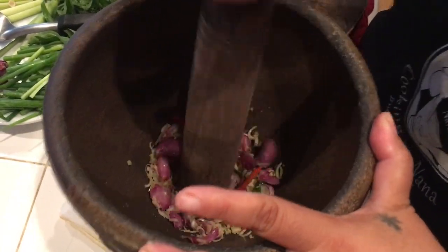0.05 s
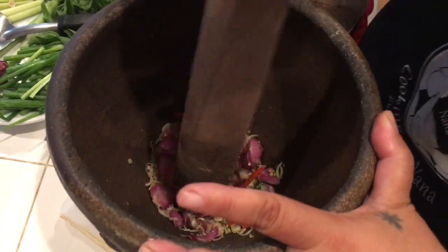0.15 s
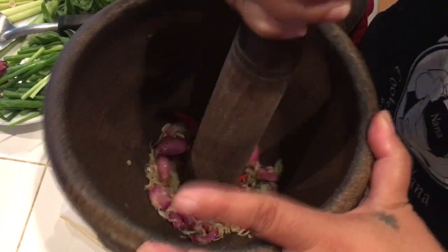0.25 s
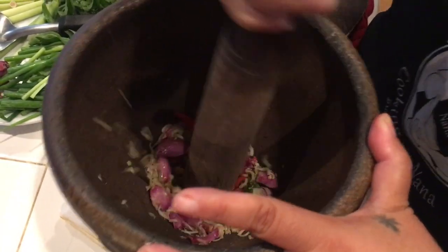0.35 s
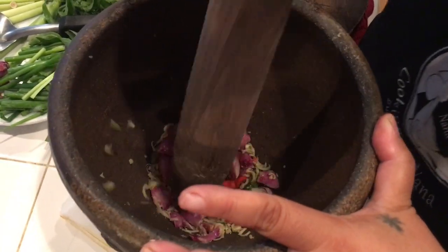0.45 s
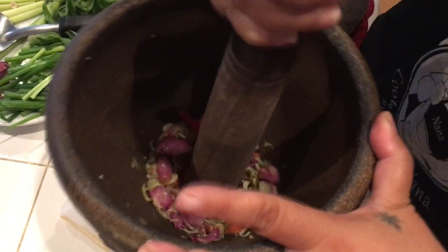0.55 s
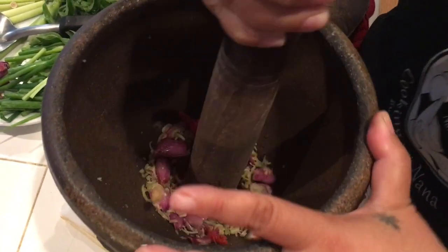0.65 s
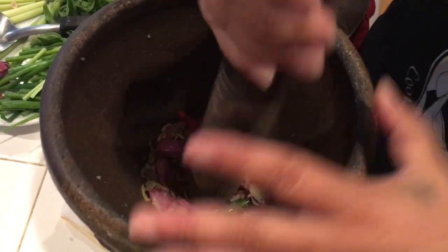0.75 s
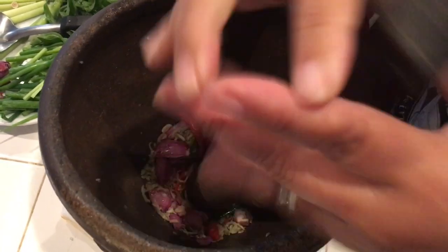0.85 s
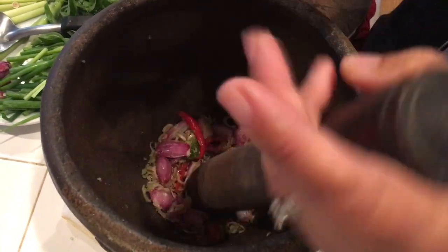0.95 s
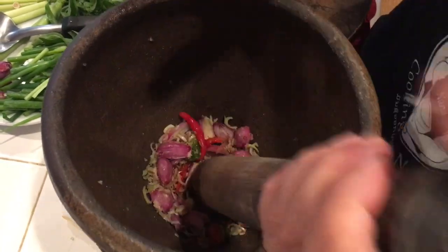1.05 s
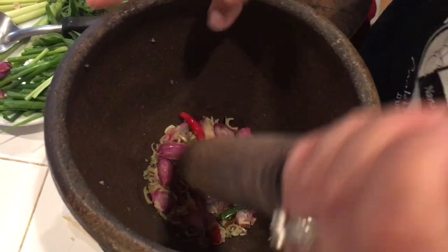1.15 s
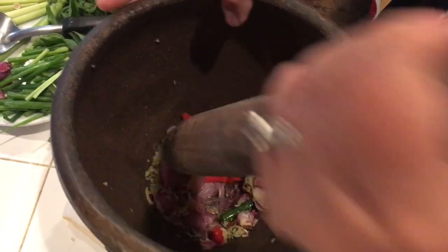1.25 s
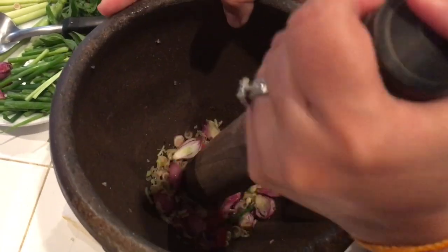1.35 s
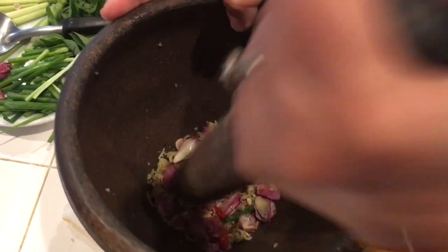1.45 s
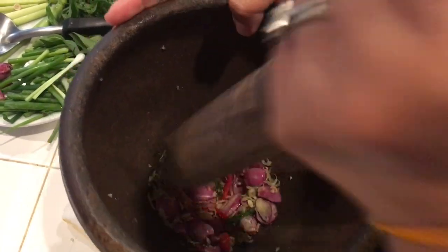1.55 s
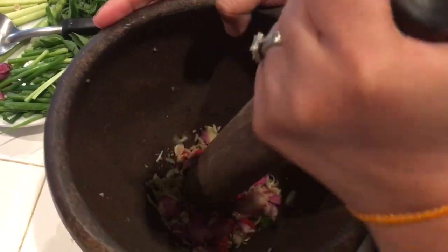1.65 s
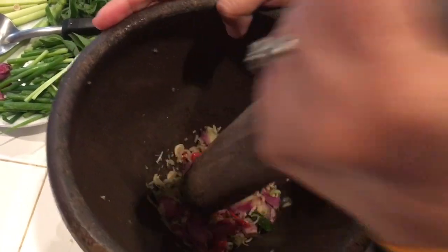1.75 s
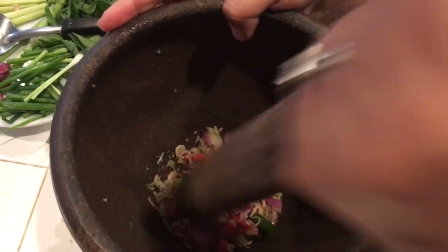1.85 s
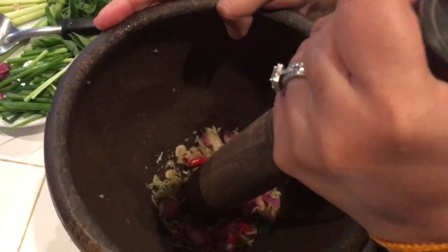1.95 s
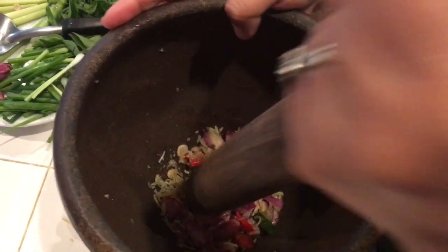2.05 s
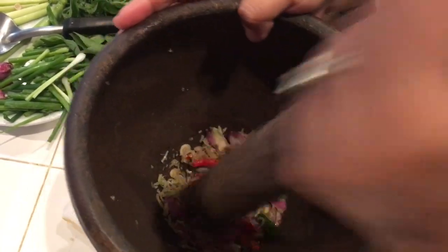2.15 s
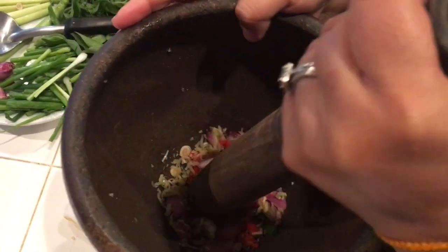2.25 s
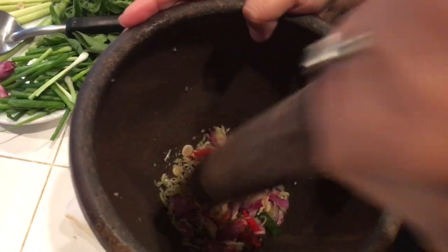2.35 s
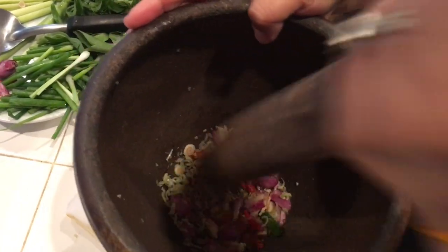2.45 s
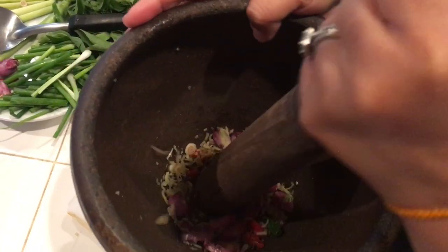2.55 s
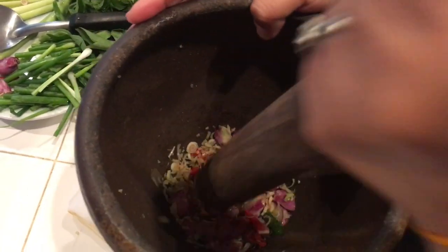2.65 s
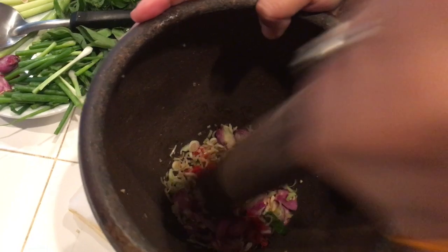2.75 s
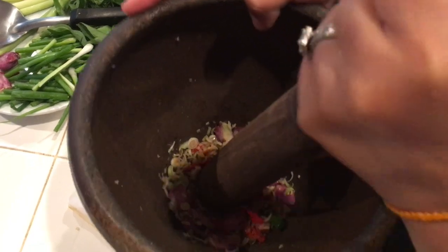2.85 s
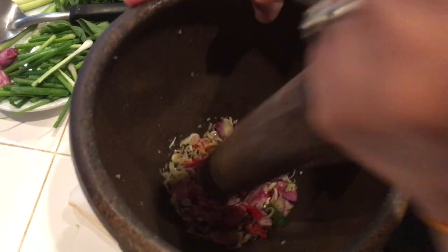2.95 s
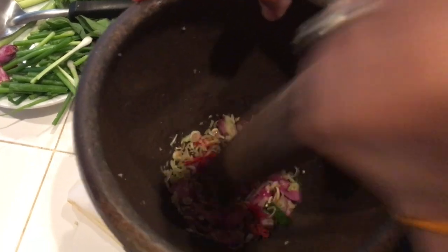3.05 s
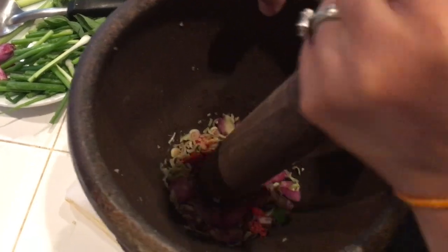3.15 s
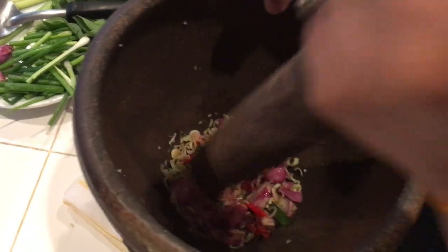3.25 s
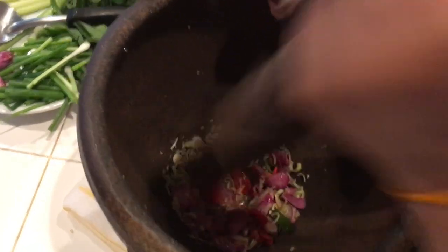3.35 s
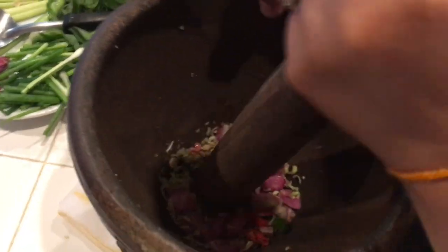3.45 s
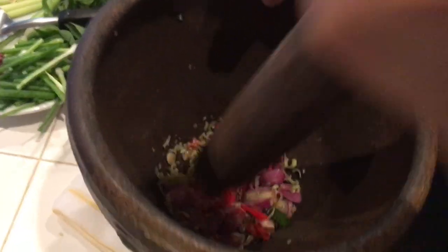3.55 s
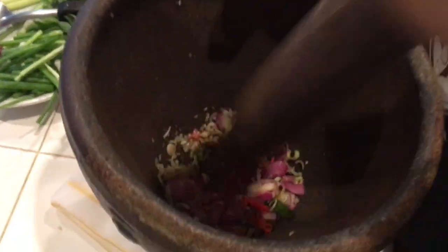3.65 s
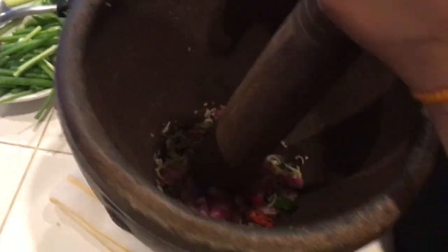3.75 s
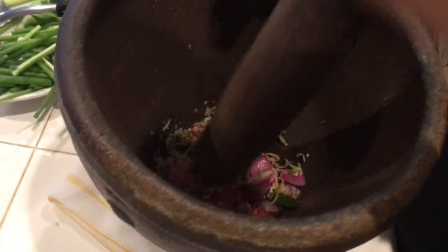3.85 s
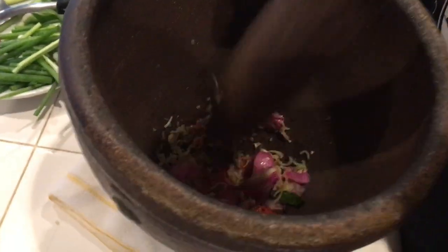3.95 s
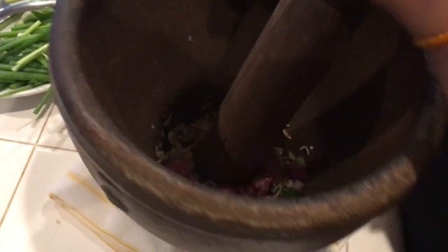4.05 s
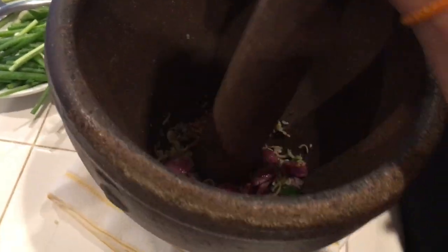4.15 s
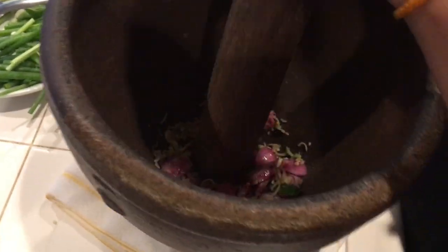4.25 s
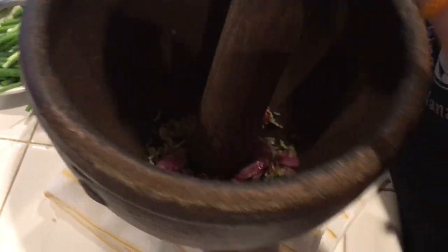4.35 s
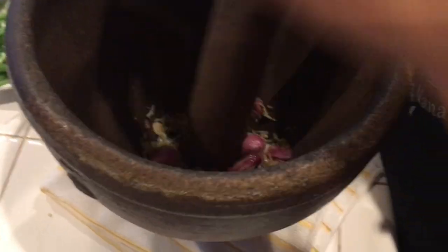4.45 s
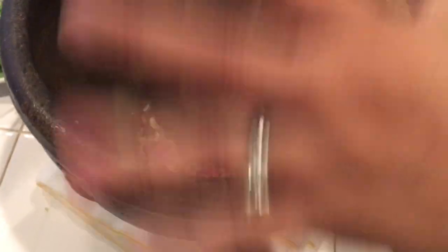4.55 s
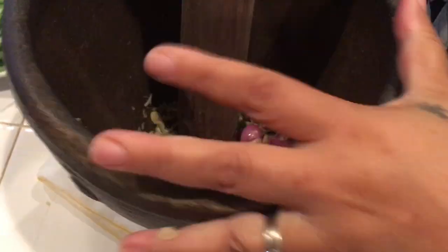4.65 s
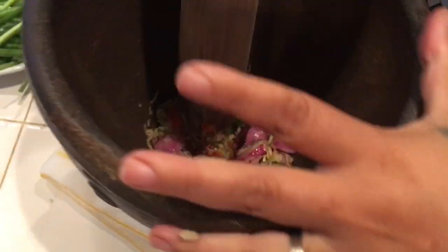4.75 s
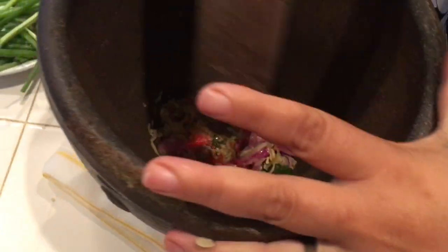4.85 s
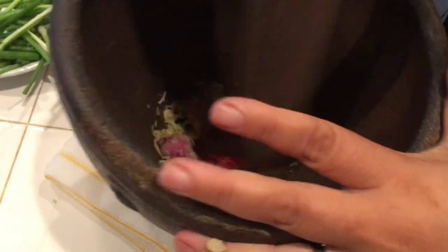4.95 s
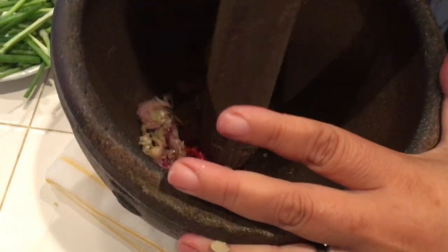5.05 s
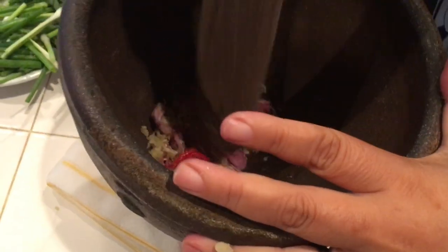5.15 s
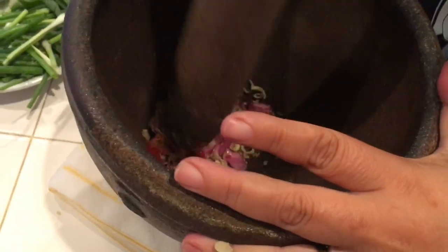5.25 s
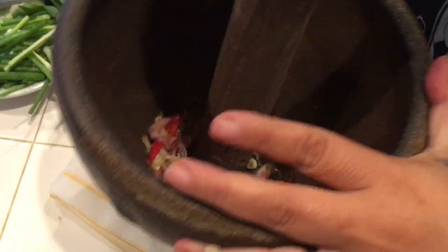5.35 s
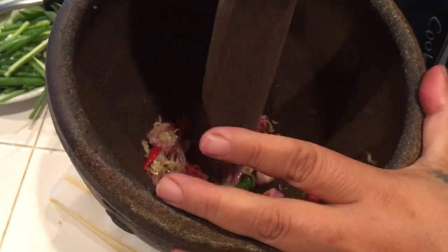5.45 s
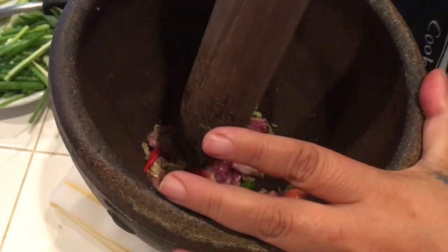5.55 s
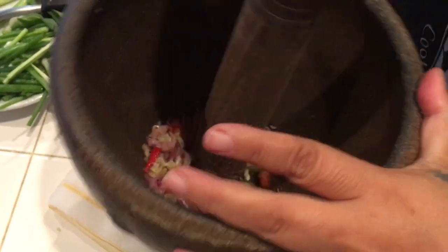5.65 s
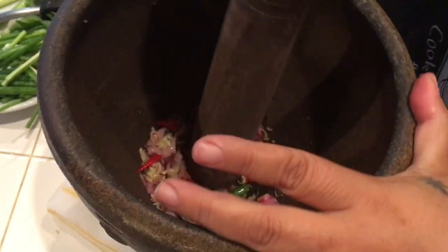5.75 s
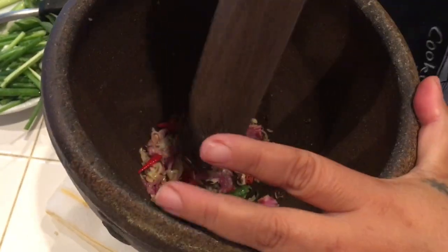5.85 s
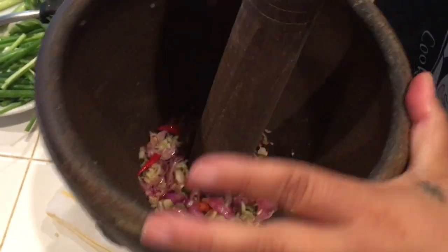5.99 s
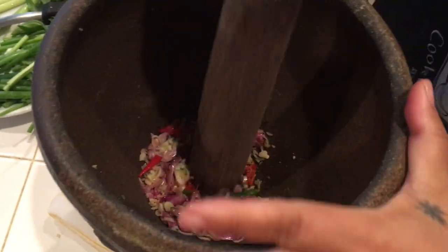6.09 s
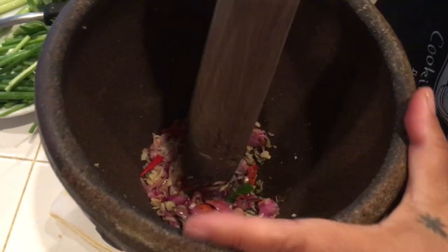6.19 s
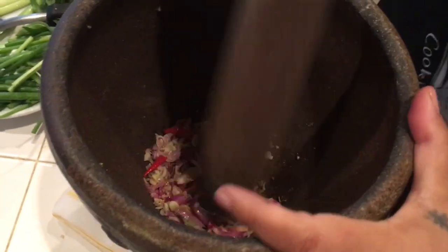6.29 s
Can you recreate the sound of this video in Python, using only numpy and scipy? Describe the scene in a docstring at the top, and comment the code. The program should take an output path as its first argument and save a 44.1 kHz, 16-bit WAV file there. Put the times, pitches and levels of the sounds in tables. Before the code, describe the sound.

Heard very close in a tiled kitchen with a soft low hum: firm pestle blows crush herbs in a thick mortar. Crunch, woody knock and padded low boom come almost together, followed by loose dishes jingling and crumbs settling. Three blows, a hand change with scuffing and a bright clay clink, nine or so regular blows, a second short gap with light rim clicks, then more pounding to the end.

```python
"""Kitchen counter: a wooden pestle pounds herbs and salt in a clay mortar, heard from close by.
Each stroke is a burst of snapping noise (crush), a knock ringing the bowl and a boom of low counter modes.
Crockery modes clatter in the boom, noise puffs tick, friction noise rustles, taps ring the rim.
Coloured noise hums; a decaying noise tail gives the echo."""
import sys
import numpy as np
from scipy import signal
from scipy.fft import rfft, irfft
from scipy.io import wavfile
from scipy.ndimage import uniform_filter1d

SR = 44100
rng = np.random.default_rng(int(sys.argv[2]) if len(sys.argv) > 2 else 0)


def dump(signal):
    """Clip the signal to [-1, 1] and save it as 16-bit WAV at the path in sys.argv[1]."""
    limited = np.clip(np.atleast_2d(signal).T, -1, 1)
    pcm = np.round(limited * 32767).astype(np.int16)
    wavfile.write(sys.argv[1], SR, pcm)


N = 278750


def amp(db):
    """dB to gain."""
    return 10 ** (np.asarray(db) / 20)


def rms_one(x):
    """Scale to rms 1."""
    return x / np.sqrt(np.mean(x ** 2) + 1e-20)


def at_hz(points, hz):
    """Read a (frequency [Hz], value) table on a log frequency axis."""
    points_hz, values = np.transpose(points)
    return np.interp(np.log(hz), np.log(points_hz), values)


def colour(x, spectrum):
    """Filter to the spectrum's shape; white noise of rms 1 stays near rms 1."""
    hz = np.fft.rfftfreq(len(x), 1 / SR) + 1   # +1 avoids log(0)
    gain = amp(at_hz(spectrum, hz))
    return irfft(rfft(x) * rms_one(gain), len(x))


def band(x, low_hz, high_hz):
    """Butterworth band-pass, upper edge held below Nyquist."""
    edges_hz = [low_hz, min(high_hz, 0.45 * SR)]
    return signal.sosfilt(signal.butter(2, edges_hz, "band", fs=SR, output="sos"), x)


def high_pass(x, low_hz):
    """Butterworth high-pass."""
    return signal.sosfilt(signal.butter(2, low_hz, "high", fs=SR, output="sos"), x)


def clicks(times_s, sizes):
    """Train of single-sample clicks."""
    out = np.full(N, 1e-18)
    at = np.clip(np.round(np.asarray(times_s) * SR).astype(int), 0, N - 1)
    np.add.at(out, at, sizes)
    return out


def ring(x, hz, t60_s):
    """Two-pole resonator: a unit click rings a decaying sine of height 1."""
    radius = amp(-60 / (t60_s * SR))
    angle = 2 * np.pi * hz / SR
    return signal.lfilter([0, np.sin(angle)], [1, -2 * radius * np.cos(angle), radius ** 2], x)


def fade(x, t60_s):
    """One-pole decay: a unit click becomes an envelope falling 60 dB in t60."""
    return signal.lfilter([1], [1, -amp(-60 / (t60_s * SR))], x)


def grit(uneven_db, clump_ms):
    """Dense snaps of uneven size that come in clumps; rms 1."""
    clump_samples = max(int(clump_ms * SR / 1000), 1)
    clumps = rms_one(uniform_filter1d(rng.standard_normal(N), clump_samples))
    return rms_one(rng.standard_normal(N) * amp(uneven_db * clumps))


def strike(times_s, db, modes, spread_db, chatter_s):
    """Blows chatter and drive each mode by a random strength; loose contact makes the rings waver."""
    luck_db = rng.normal(0, spread_db, (len(times_s), len(modes)))
    unit_energy = np.sqrt(2 * np.log(1000) / (chatter_s * SR))   # per blow
    rough = rng.standard_normal(N) * unit_energy
    waver = amp(4.2 * rms_one(uniform_filter1d(rng.standard_normal(N), int(0.0074 * SR))))
    out = np.zeros(N)
    for k, (hz, level_db, t60_s) in enumerate(modes):
        chatter = rough * fade(clicks(times_s, amp(db + level_db + luck_db[:, k])), chatter_s)
        out += ring(chatter, hz, t60_s) * np.roll(waver, 997 * k)   # shifted: modes waver apart
    return out


def dying_noise(starts, spectrum, t60s):
    """Noise starts at the clicks and decays, each octave at its own pace."""
    noise = colour(grit(uneven_db=2.5, clump_ms=3.6), spectrum)
    out = np.zeros(N)
    for low_hz in 250 * 2.0 ** np.arange(7):
        t60_s = at_hz(t60s, low_hz * np.sqrt(2))
        out += band(noise, low_hz, 2 * low_hz) * fade(starts, t60_s)
    return out


# Hum spectrum: (frequency [Hz], relative density [dB per Hz])
HUM_SPECTRUM = [(18, -47), (30, -8.5), (64, 1.5), (144, 0.5), (225, -1.5), (285, -12.5), (495, -17.5),
                (1570, -15.5), (2940, -25), (3620, -28), (4830, -40.5), (5960, -34), (7740, -36.5),
                (12400, -40), (15700, -44)]
HUM_DB = -47


def hum():
    """Steady kitchen hum: noise shaped to the spectrum."""
    return amp(HUM_DB) * colour(rng.standard_normal(N), HUM_SPECTRUM)


# Room decay: (frequency [Hz], t60 [s])
ROOM_T60 = [(200, 0.46), (1500, 0.49), (5000, 0.4), (14000, 0.27)]


def kitchen_echo(x):
    """Diffuse echo: convolution with a noise tail dying octave by octave."""
    t_s = np.arange(int(0.7 * SR)) / SR
    noise = rng.standard_normal(len(t_s))
    tail = np.zeros(len(t_s))
    for low_hz in 125 * 2.0 ** np.arange(8):
        t60_s = at_hz(ROOM_T60, low_hz * np.sqrt(2))
        tail += band(noise, low_hz, 2 * low_hz) * amp(-60 * t_s / t60_s)
    tail *= np.clip(t_s / 0.0087, 0, 1)   # onset ramp
    return signal.fftconvolve(x, tail / np.sqrt(np.sum(tail ** 2)))[:N]


# Pestle and hands dragging over herbs: (time [s], level [dB])
RUSTLE_LEVELS = [(0, -63), (.3, -64.5), (.75, -57), (1.0, -56.5), (1.25, -66), (1.6, -66), (2.2, -65),
                 (2.8, -65), (3.4, -66.5), (4.0, -66.5), (4.3, -58.5), (4.65, -66.5), (4.9, -71.5),
                 (5.3, -63.5), (6.32, -62.5)]
RUSTLE_AIR_DB = 2.5   # airy part over grainy part


def rustle():
    """Grainy friction of pestle, herbs and hands: two noise bands under a slow level curve."""
    times_s, levels_db = np.transpose(RUSTLE_LEVELS)
    level = amp(np.interp(np.arange(N) / SR, times_s, levels_db))
    grains = grit(uneven_db=2.5, clump_ms=3.4)
    grainy = rms_one(band(grains, 1200, 6400))
    airy = rms_one(band(grains, 11000, 0.45 * SR))
    return level * (grainy + amp(RUSTLE_AIR_DB) * airy)


# Crumbs, skin and cloth tick and brush: (start [s], level [dB], pitch [Hz], length [ms])
TICK_EVENTS = [(0.15, -51.5, 13000, 54), (0.443, -47, 5000, 39), (.876, -48, 8000, 9),
               (0.935, -48.5, 6130, 8.7), (1.037, -40.5, 5500, 8.7), (1.099, -50, 14300, 76),
               (1.247, -53, 6000, 4.5), (1.80, -46, 3500, 11), (2.468, -55, 12000, 5.6),
               (2.568, -33, 6000, 1.8), (2.688, -50, 9000, 28), (2.969, -38.5, 10000, 3.5),
               (3.276, -46, 3940, 29), (4.321, -49, 10970, 5.5), (4.62, -57, 12100, 6),
               (4.671, -49, 11100, 5.4), (5.56, -54, 13000, 11), (6.165, -47.5, 4507, 33)]
FAINT_TICKS, FAINT_DB = 14, -62


def ticks():
    """Short band-passed noise puffs, each with its own colour; faint ones fall at random."""
    lowest = [0, FAINT_DB - 4, 4000, 3]
    highest = [N / SR - 0.1, FAINT_DB + 4, 14000, 25]
    rows = np.r_[TICK_EVENTS, rng.uniform(lowest, highest, (FAINT_TICKS, 4))]
    out = np.zeros(N)
    noise = rng.standard_normal((len(rows), 5000))
    for (start_s, db, hz, length_ms), puff in zip(rows, noise):
        shape = signal.windows.tukey(min(int(length_ms * SR / 1000), len(puff)), 0.6)
        puff = rms_one(band(puff, hz / 7.9, hz * 1.26))
        at = int(start_s * SR)
        out[at:at + len(shape)] += amp(db) * puff[:len(shape)] * shape
    return out


# Rim taps: (time [s], ring [dB], best-driven pitch [Hz], reach [octaves], crack [dB])
TAP_EVENTS = [(0.9932, -28.5, 2930, 0.072, -35), (1.1218, -18.5, 930, 0.75, -28),
              (1.135, -25.5, 850, 0.52, -50), (4.717, -35.5, 2060, 2.1, -21.5),
              (4.7219, -28.5, 1500, 0.92, -28), (4.734, -36, 1500, 0.66, -40)]
# Rim modes: (frequency [Hz], level [dB], t60 [s])
RIM_MODES = [(420, -23, 0.25), (729, -10, 0.42), (763, -6, 0.19), (816, -1.5, 0.021), (1210, -9, 0.04),
             (1288, -4.5, 0.069), (1885, 6, 0.03), (1972, -11, 0.23), (2660, -3.5, 0.028),
             (2980, -0.5, 0.022), (3200, -2, 0.055), (3530, -1.5, 0.087), (5320, 4, 0.026),
             (5830, 17.5, 0.015), (6080, -8, 0.05), (7560, 9, 0.028)]


def taps():
    """Touches on the rim; place and hardness decide which modes answer; each adds a noise crack."""
    times_s, ring_db, best_hz, reach_oct, crack_db = np.transpose(TAP_EVENTS)
    out = np.zeros(N)
    for hz, level_db, t60_s in RIM_MODES:
        miss_db = 3.2 * (np.log2(hz / best_hz) / reach_oct) ** 2
        out += ring(clicks(times_s, amp(ring_db + level_db - miss_db)), hz, t60_s)
    noise = rng.standard_normal(N)
    for time_s, best, db in zip(times_s, best_hz, crack_db):
        crack = fade(clicks([time_s], amp(db)), 0.0098)
        out += crack * rms_one(band(noise, best / 3, best * 8))
    return out


# Crockery jumps on the counter: (time [s], hiss [dB], ring [dB])
JUMPS = [(0.074, -36, -43.5), (0.665, -47, -49), (0.6877, -21.5, -34.5), (1.736, -30.5, -48),
         (2.0262, -28.5, -47), (2.0375, -46, -48.5), (2.315, -29.5, -44), (2.901, -27, -38.5),
         (2.9344, -42, -56), (3.224, -31, -46.5), (3.5162, -30, -52), (4.1184, -31, -48), (4.148, -35, -48),
         (5.45, -31, -54), (5.7985, -32, -45)]
# Crockery modes: (frequency [Hz], level [dB], t60 [s])
CROCKERY_MODES = [(620, -27.5, 0.082), (692, -6, 0.11), (980, -23.5, 0.077), (1475, -28, 0.09),
                  (1865, -25, 0.088), (2690, -12, 0.15), (1558, -2.5, 0.095), (2227, -13, 0.34),
                  (2340, 0.5, 0.046), (2408, -15.5, 0.15), (3170, -16.5, 0.39), (3360, -4.5, 0.11),
                  (3840, -19, 0.078), (3840, -1, 0.12), (4370, -4, 0.071), (4540, -13, .12),
                  (5650, -23, .12), (5830, -22.5, 0.18), (6700, -4, 0.05), (6690, 0, 0.092),
                  (7300, -8, .08), (7800, 0.5, 0.11), (8750, -8, 0.15), (8900, 2, 0.093), (8900, -7, 0.089),
                  (9300, -4, 0.087), (11750, -17, 0.1)]
DEBRIS_DB, DEBRIS_T60_S = -10, 0.37   # trickling grains, level below the jump's hiss
SHAKE_DB, SHAKE_LEAD_S = -17.5, 0.008   # rattle relative to the boom; lead on deepest swing


def clatter():
    """The boom shakes the crockery dully; each jump adds a short hiss, trickling grains and a rough ring."""
    times_s, hiss_db, ring_db = np.transpose(JUMPS)
    short = fade(clicks(times_s, amp(hiss_db)), 0.023)
    debris = fade(clicks(times_s, amp(hiss_db + DEBRIS_DB)), DEBRIS_T60_S)
    hiss = band(grit(uneven_db=3.5, clump_ms=3.8), 1900, 19000) * (short + debris)
    jumps = strike(times_s, ring_db, CROCKERY_MODES, spread_db=2.5, chatter_s=0.11)
    land_s, *_, swing_ms, boom_db, _, _ = np.transpose(STROKES)
    shake_s = land_s + swing_ms / 1000 - SHAKE_LEAD_S
    shaken = strike(shake_s, boom_db + SHAKE_DB, CROCKERY_MODES, spread_db=2.0, chatter_s=0.21)
    return hiss + jumps + band(band(shaken, 300, 2600), 300, 2600)   # twice: steeper


# Settling spectrum: (frequency [Hz], relative density [dB per Hz])
SETTLE_SPECTRUM = [(180, 6.5), (300, -5), (418, -15.5), (1000, -6.5), (1600, -19), (2300, -8.5),
                   (5910, -25.5), (8100, -9), (13300, -48), (15700, -91)]
# Settling decay: (frequency [Hz], t60 [s])
SETTLE_DECAY = [(300, 0.25), (1400, 0.33), (3700, 0.15), (10000, 0.12)]
SETTLE_DB, SETTLE_FOLLOWS = -6.5, 1.32   # level at a 0 dB boom; dB per dB of boom


def settle():
    """Crumbs spring back and the bowl murmurs after each crush: dying noise, more after a hard boom."""
    land_s, crush_ms, *_, boom_db, _, _ = np.transpose(STROKES)
    starts = clicks(land_s + (crush_ms + LAST_MS) / 1000, amp(SETTLE_DB + SETTLE_FOLLOWS * boom_db))
    return dying_noise(starts, SETTLE_SPECTRUM, SETTLE_DECAY)


# Counter modes: (frequency [Hz], level [dB], t60 [s], direction and gain [-],
#                 lead on the deepest swing [ms])
COUNTER_MODES = [(35.3, -16, 0.32, 0.95, 4.4), (61.45, 2.5, 0.22, -0.88, 5.85),
                 (75.1, -2, 0.24, 0.81, 7.58), (100, -27, 0.45, -0.083, 7.2), (125.6, -6, 0.15, 0.9, 5.05),
                 (160.4, -14.5, 0.47, -0.34, 7.7), (201, -13.5, 0.1, 0.41, 9.8)]
LANDING_PUSH_DB = -12.5   # relative to the landing level


def thuds():
    """A padded push rings the counter's low modes; landing on the herbs gives a lighter push first."""
    land_s, _, land_db, *_, swing_ms, boom_db, upper_db, _ = np.transpose(STROKES)
    boom = np.zeros(N)
    for hz, level_db, t60_s, direction, lead_ms in COUNTER_MODES:
        push_db = boom_db + level_db + upper_db * (hz > 100)
        main = clicks(land_s + (swing_ms - lead_ms) / 1000, amp(push_db))
        landing = clicks(land_s, amp(land_db + level_db + LANDING_PUSH_DB))
        boom += direction * ring(main + landing, hz, t60_s)
    pad = np.hanning(int(0.0046 * SR))
    return np.convolve(boom, pad / pad.sum(), "same")


# Bowl modes: (frequency [Hz], level [dB], t60 [s])
BOWL_MODES = [(307, -13, 0.068), (404, -3.5, 0.035), (441.5, -24.5, 0.2), (445, -22.5, 0.035),
              (638, -12, 0.016), (820, -13, 0.015), (1180, -9, 0.031), (1468, -18, 0.029)]
HOLLOW_HZ, HOLLOW_TOP_HZ = 408, 700   # reference pitch; modes below the top follow the hollow
KNOCK_AFTER_MS = 2.194   # after the last burst is reached
WEIGHT_MS, WEIGHT_DB = 1.947, 1.5   # full weight: delay and gain over the first touch


def knocks():
    """Two-step contact rings the bowl; its low modes move with how far pestle and hand cover the hollow."""
    out = np.zeros(N + SR)
    size = SR // 4
    for land_s, crush_ms, *_, hollow_hz, _, _, _, knock_db in STROKES:
        touch = clicks([0, WEIGHT_MS / 1000], -amp([knock_db, knock_db + WEIGHT_DB]))[:size]
        at = int((land_s + (crush_ms + KNOCK_AFTER_MS) / 1000) * SR)
        for hz, level_db, t60_s in BOWL_MODES:
            shift = hollow_hz / HOLLOW_HZ if hz < HOLLOW_TOP_HZ else 1
            out[at:at + size] += amp(level_db) * ring(touch, hz * shift, t60_s)
    return band(out[:N], 153, 3000)   # the small bowl radiates no deep bass


# Crushing spectrum: (frequency [Hz], relative density [dB per Hz])
CRUNCH_SPECTRUM = [(350, -6), (600, -18), (810, -19), (1310, -2), (2110, -0.5), (2770, -5.5), (3850, 0),
                   (4120, -3.5), (5870, -1), (7610, -10), (9470, -6), (10600, -11.5), (11800, -6.5),
                   (15700, -6.5)]
# Pestle strokes: (landing [s], crush up to the last burst [ms], landing [dB], mid-crush [dB],
#   last burst [dB], treble tilt [dB], lead-in [ms], pitch of the bowl's hollow [Hz],
#   landing to the counter's deepest swing [ms], boom [dB], extra on upper boom modes [dB], knock [dB])
STROKES = [(0.0296, 7.9, -16, -15, -15.5, -1, 19.5, 415, 26, -13, 3, -28.5),
           (0.3323, 12.9, -13.5, -19, -13, 1.5, 9.3, 390, 30.3, -14.5, 5, -20.5),
           (0.6358, 4.9, -3, -18, -10.5, -2, 11, 416, 22.5, -9.5, 4.5, -23),
           (1.381, 32.2, -25.5, -21, -28, -0.5, 19, 436, 39.8, -27.5, 2, -37),
           (1.6811, 15.2, -31, -22, -13.5, 3.5, 11.5, 388, 36.4, -11.5, 3, -20),
           (1.9805, 9.9, -14.5, -13.5, -13.5, 0, 11.5, 430, 22.9, -12.5, 3.3, -26.5),
           (2.2701, 7.8, -13, -18, -12, 2.5, 9.6, 395, 25.1, -13.5, 4.5, -17.5),
           (2.579, 17.7, -20, -16, -18.5, 1.5, 12, 400, 33.6, -19, 6, -31),
           (2.876, 6.4, -6.5, -14, -18.5, 0, 8.4, 424, 21.3, -8.5, 6, -16),
           (3.169, 8.6, -10.5, -15.5, -13, 5.5, 12, 410, 26.9, -12, 7, -15.5),
           (3.470, 8.6, -16, -18, -13, 5, 11.3, 389, 27, -11.5, 4.5, -20.5),
           (3.7744, 32, -10.5, -24.5, -13.5, 6.5, 7.8, 400, 48.7, -13, 5.5, -34),
           (4.072, 22.4, -17, -25.5, -12, 4.8, 7.5, 397, 40.8, -6, 6, -15.5),
           (5.049, 43.4, -10.5, -21.5, -21, 1.8, 5.2, 415, 22.5, -26.5, 8, -41),
           (5.405, 13, -29, -19.5, -21.5, 5.5, 6.6, 416, 26, -11, 4, -25.5),
           (5.7416, 4.7, -10, -10.5, -13, 4, 9.7, 393, 21.2, -9, 4, -13.5),
           (6.0435, 10.7, -7.5, -21, -12, 2, 7.7, 451, 26.5, -17, 9, -2.5)]
LEAD_IN_DB = -46   # first herbs touched
KNEE_DB, RISE_SHARE = -35, 0.36   # final rise: start level, share of the lead-in
SAG_MS, BUILD_MS = 4.4, 2.7   # landing to mid-crush; mid-crush to last burst; each at most half the crush
LAST_MS, STOP_MS, STOP_DB = 2.71, 8, -25   # last burst: hold, stop time, drop


def crush():
    """Fibres and salt snap under the pestle: burst on landing, last burst at the bottom, sudden stop."""
    level, tilt_db = np.zeros(N), np.zeros(N)
    for land_s, crush_ms, land_db, mid_db, last_db, stroke_tilt_db, lead_ms, *_ in STROKES:
        sag_ms = min(SAG_MS, crush_ms / 2)
        build_ms = max(crush_ms - BUILD_MS, crush_ms / 2)
        hold_ms = crush_ms + LAST_MS
        ramp_ms = [-lead_ms, -RISE_SHARE * lead_ms, 0, sag_ms, build_ms, crush_ms, hold_ms, hold_ms + STOP_MS]
        ramp_db = [LEAD_IN_DB, KNEE_DB, land_db, mid_db, mid_db, last_db, last_db, last_db + STOP_DB]
        ramp_s = land_s + np.array(ramp_ms) / 1000
        span = np.arange(max(int(ramp_s[0] * SR), 0), int(ramp_s[-1] * SR))
        level[span] = amp(np.interp(span / SR, ramp_s, ramp_db))
        tilt_db[span] = stroke_tilt_db
    snaps = colour(grit(uneven_db=0.5, clump_ms=0.95), CRUNCH_SPECTRUM)
    return level * (snaps + (amp(tilt_db) - 1) * high_pass(snaps, 7000))


def scene():
    """Everything near the mortar, its echo and the hum of the room."""
    hollow, rim = knocks(), taps()
    muffled = crush() + thuds() + clatter() + ticks()
    # hard knocks fill the room more
    echo = kitchen_echo(amp(-19.5) * muffled + amp(-18.0) * hollow + amp(-14.0) * rim)
    return (muffled + hollow + rim + echo + settle() + rustle() + hum())[None]


CUTOFF_HZ, CEILING = 16350, 0.95


def record(dry):
    """Round the highest peaks with a soft ceiling, then cut the top with a steep low-pass."""
    rounded = dry / (1 + np.abs(dry / CEILING) ** 6) ** (1 / 6)
    steep = signal.cheby2(18, 75, CUTOFF_HZ, fs=SR, output="sos")
    return signal.sosfilt(steep, rounded)


dry = scene()
out = record(dry)
dump(out)
```